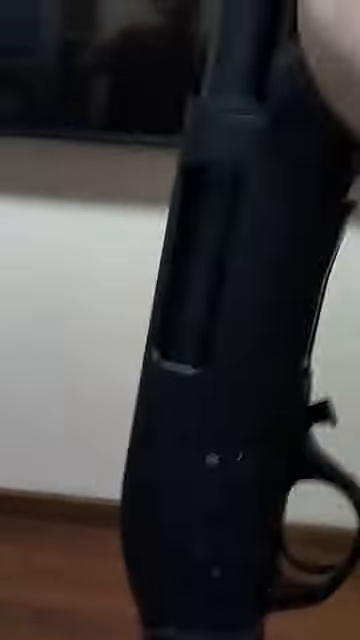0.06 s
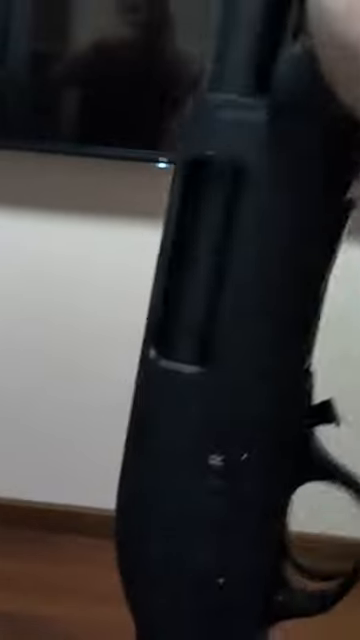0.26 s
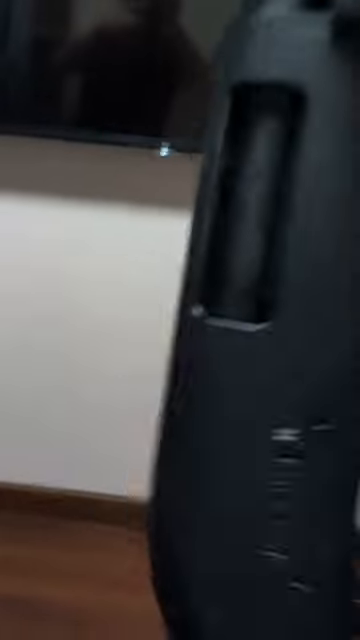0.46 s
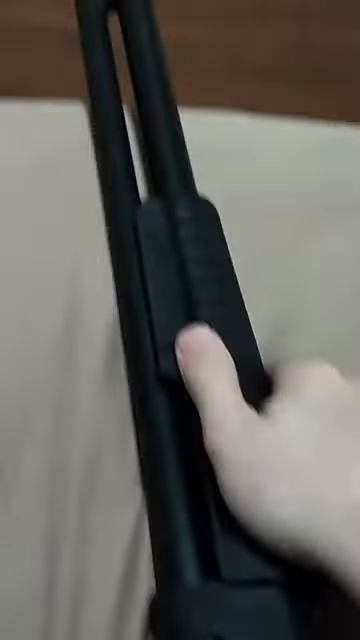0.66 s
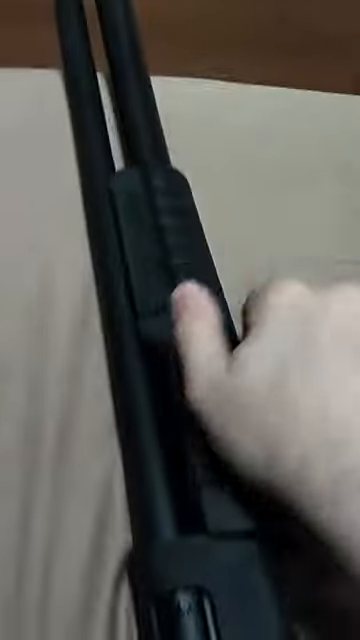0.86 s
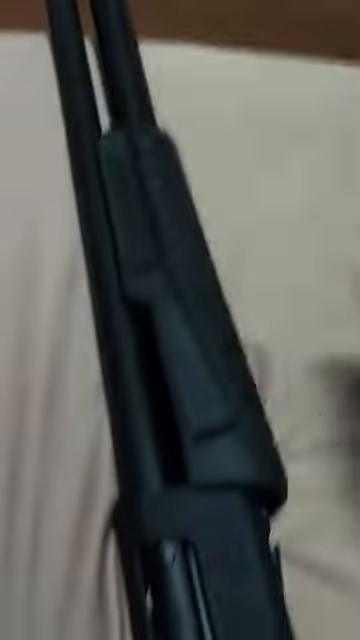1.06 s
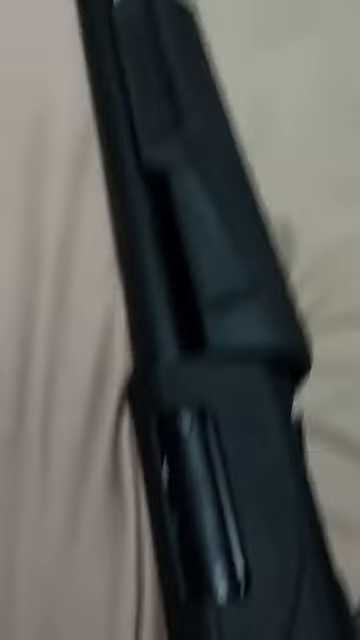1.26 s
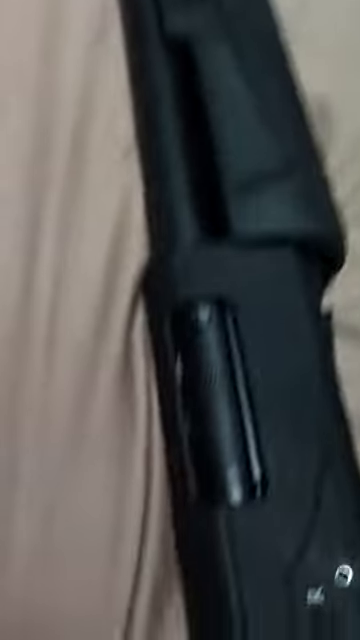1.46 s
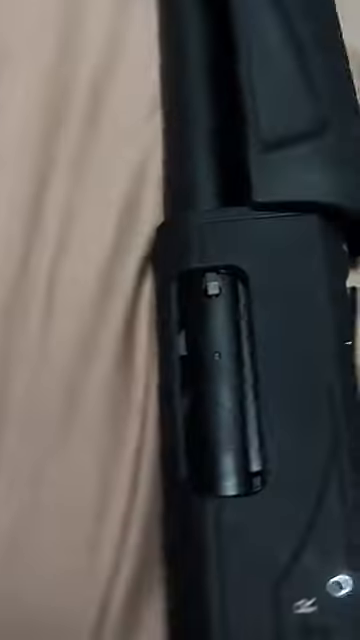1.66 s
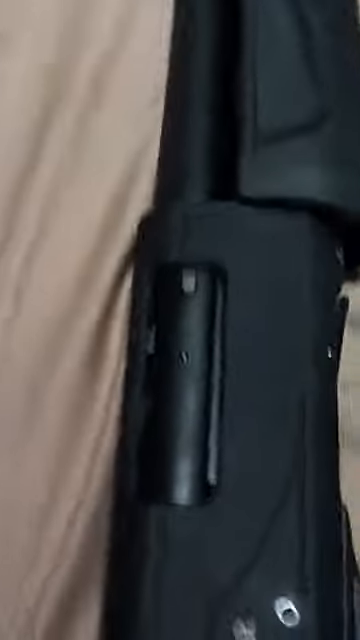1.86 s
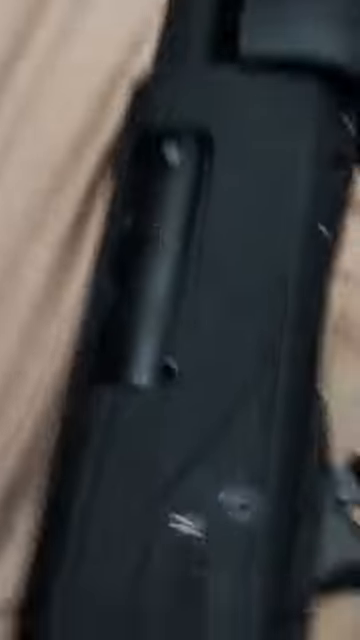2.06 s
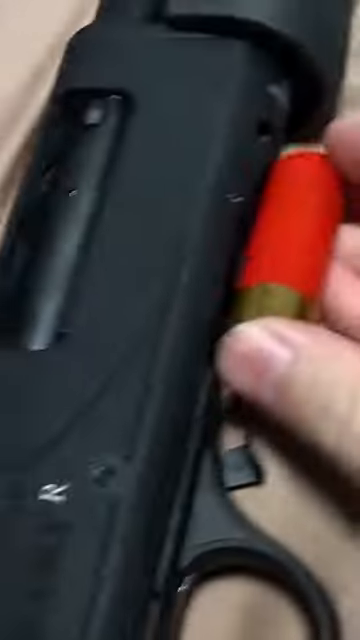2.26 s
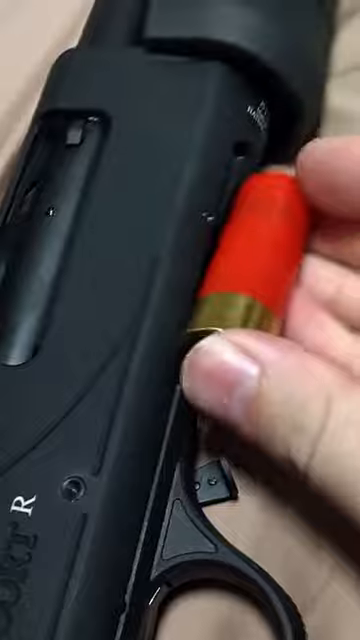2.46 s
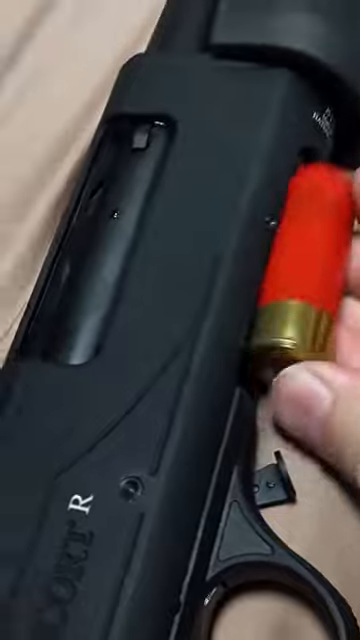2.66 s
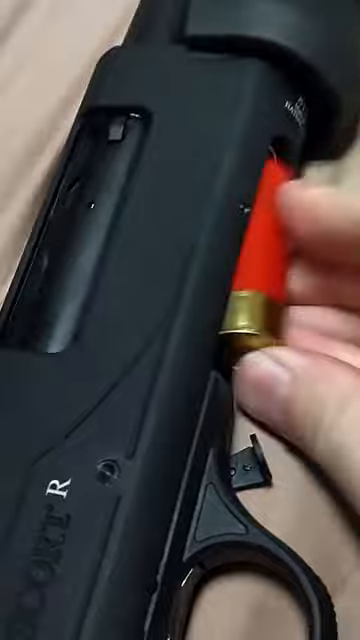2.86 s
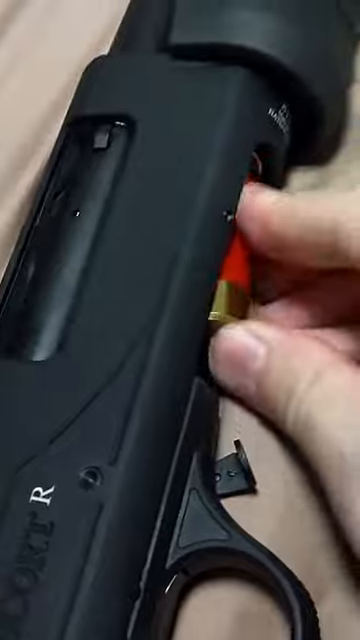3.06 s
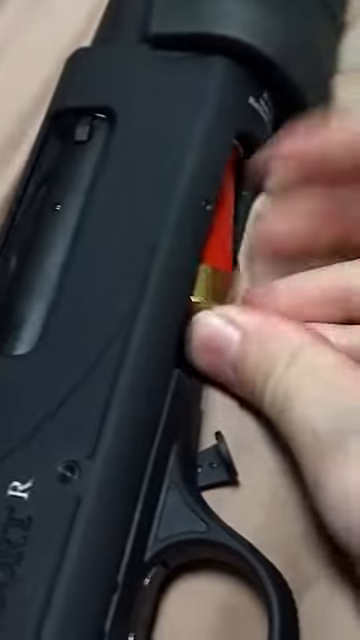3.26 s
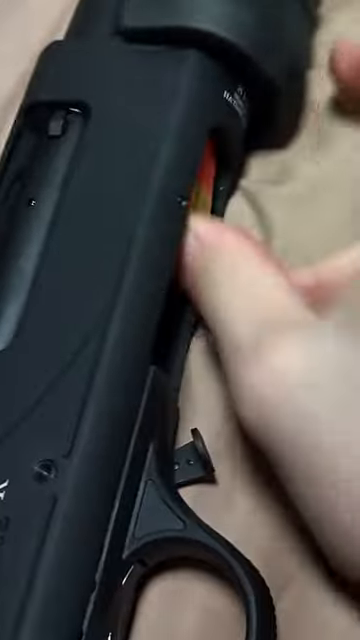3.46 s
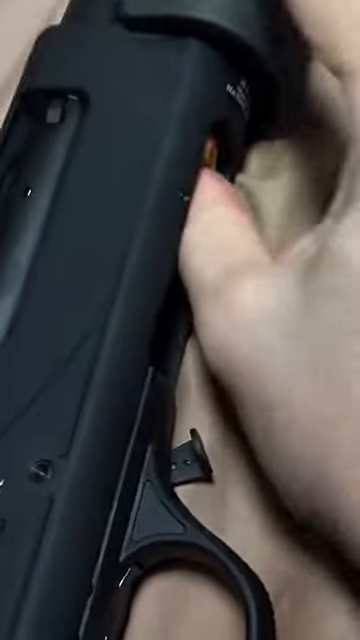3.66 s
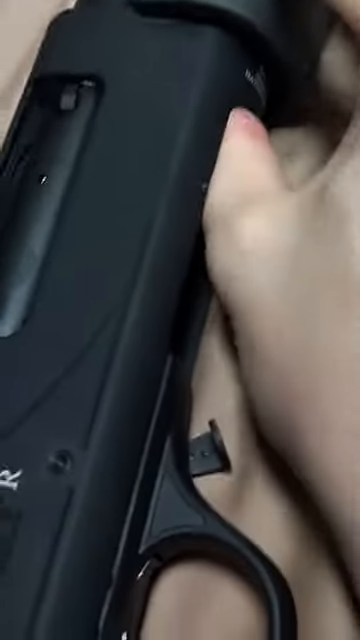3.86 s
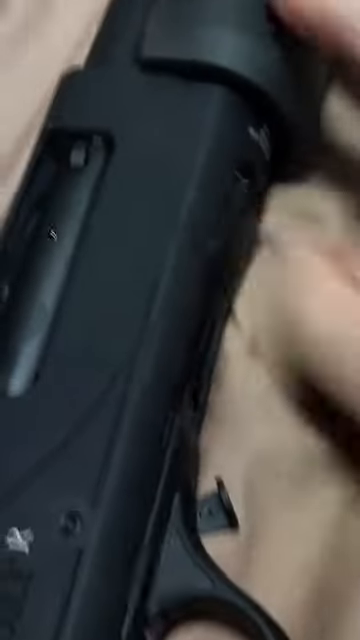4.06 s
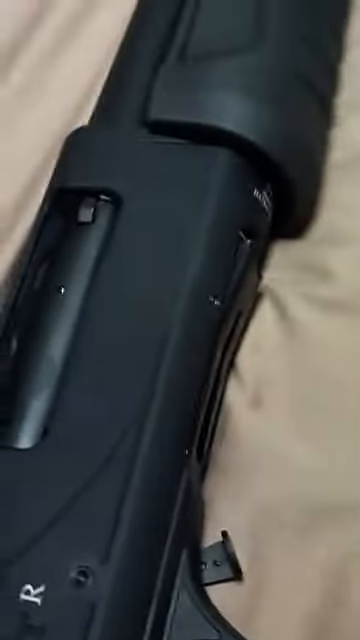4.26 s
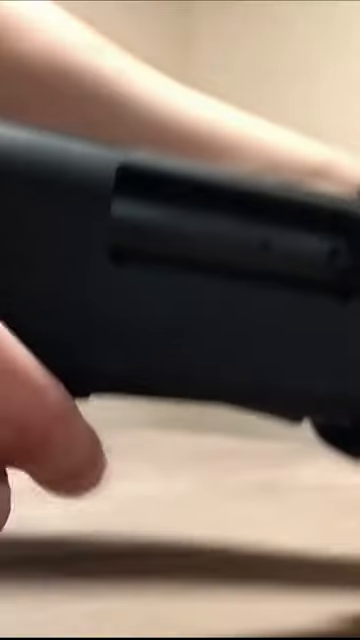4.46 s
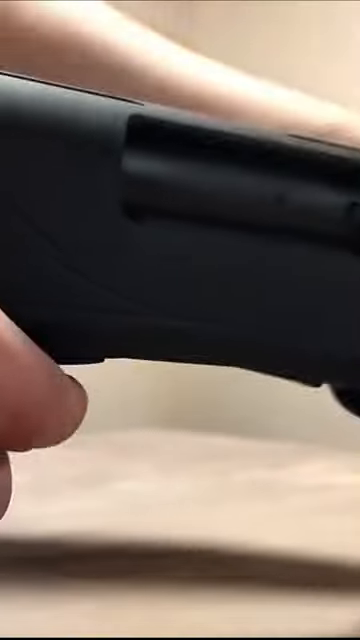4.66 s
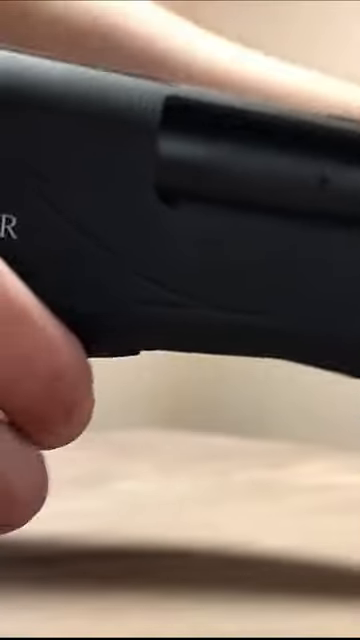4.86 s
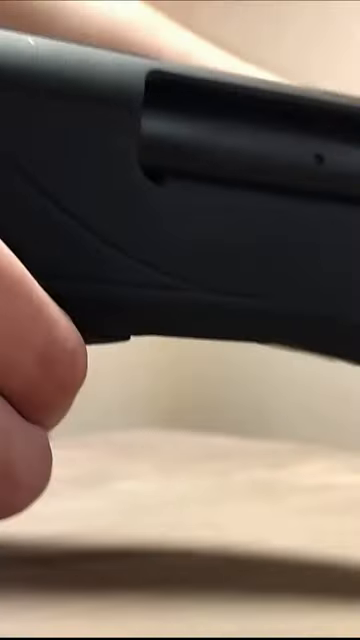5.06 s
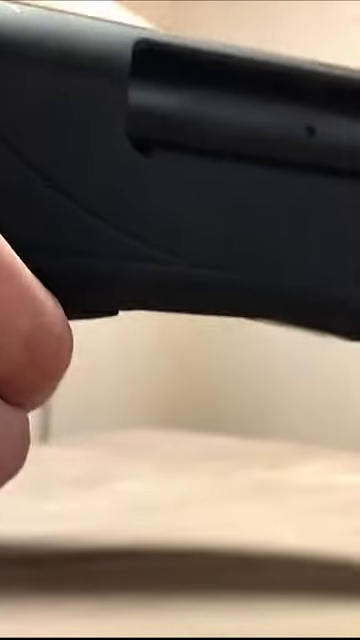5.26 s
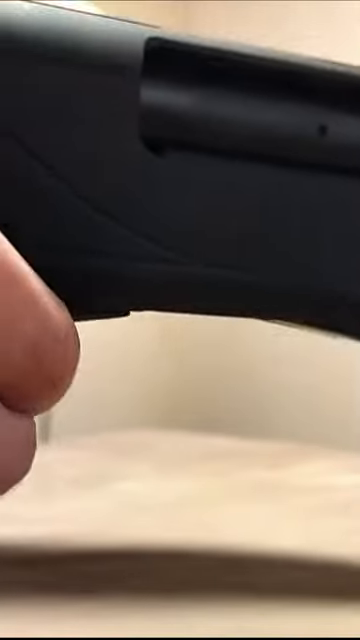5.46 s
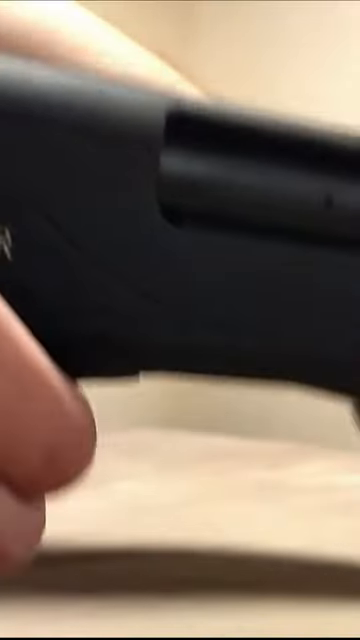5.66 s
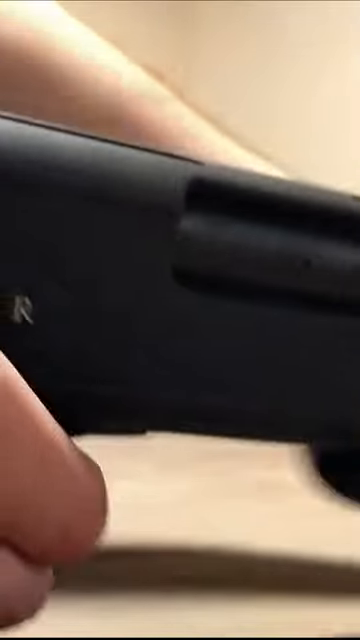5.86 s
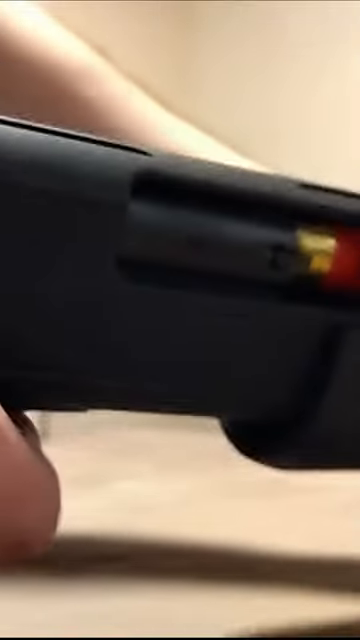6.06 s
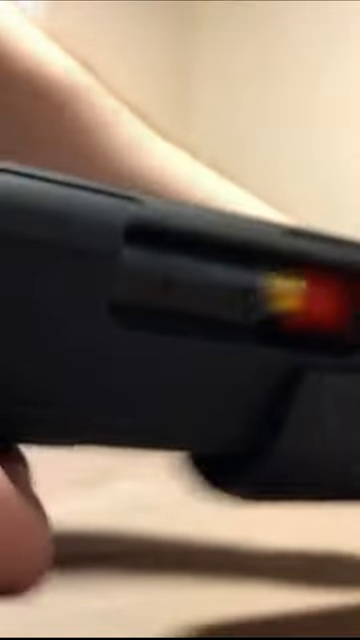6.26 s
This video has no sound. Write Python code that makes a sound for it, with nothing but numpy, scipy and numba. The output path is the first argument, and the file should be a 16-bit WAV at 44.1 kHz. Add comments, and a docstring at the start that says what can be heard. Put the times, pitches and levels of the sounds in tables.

```python
"""The slam of a shotgun slide dies away in a room, over a low rumble; the gun lies on a bed close to a phone.
A shell is then tapped, slid and thumbed into the magazine, and the slide is eased back with a rough whine.
Contacts are short noise chatters that ring hollow and small parts, receiver, steel and room.
Rubbing and faint hiss are stick-slip ticks through broad resonances; the rumble is shaped noise.
Gain control, clipping and band limits shape the sum."""
import sys
import numpy as np
from scipy import signal
from scipy.fft import rfft, irfft
from scipy.io import wavfile
from scipy.ndimage import uniform_filter1d
from numba import njit

SR = 44100
rng = np.random.default_rng(int(sys.argv[2]) if len(sys.argv) > 2 else 0)


def to_wav(s):
    """Save 16-bit WAV."""
    ch = np.atleast_2d(s).T  # columns
    pcm = np.round(np.clip(ch, -1, 1) * 32767)  # PCM
    wavfile.write(sys.argv[1], SR, pcm.astype(np.int16))


N = 277830
LEAD = SR // 10  # samples computed ahead of the start, so that earlier echoes are heard

# Room rumble and hiss, relative: (frequency [Hz], spectral level [dB per Hz])
HUM_SPECTRUM = [(25, -42.5), (45, -30), (74, -16), (113, 2), (148, -7), (200, -7), (235, -12.5),
                (307, -13.5), (333, -14), (437, -18), (1510, -30), (1730, -27.5), (4570, -32.5),
                (12100, -36.5), (15800, -33.5)]
# Left-right correlation of the rumble: (frequency [Hz], correlation [-1..1])
HUM_CORRELATION = [(60, 0.93), (130, 1), (290, 0.94), (640, -0.036), (1410, 0.31), (3100, -0.38),
                   (6820, -0.59), (15000, 0.18)]
HUM_RMS_DB = -46.5  # ahead of the gain control

# Decay of the room: (frequency [Hz], time to fall 60 dB [s])
ROOM_T60 = [(60, 0.56), (200, 0.5), (500, 0.43), (1500, 0.64), (4000, 0.67), (8000, 0.53), (15000, 0.25)]
# Left-right correlation of the echoes: (frequency [Hz], correlation [-1..1])
ROOM_CORRELATION = [(100, .6), (300, 0.21), (1400, -0.12), (5000, 0.14), (8500, 0.63), (11500, 0.74),
                    (15000, 0.505)]
ROOM_GAP_S, ROOM_FILL_S = .007, .011  # way to the first wall and back, time for the echoes to thicken
ECHO_WAVER_DB = 2.4  # random level wavering of the echoes, separate in each band

# Stock, action and bed shaking: (frequency [Hz], width of each of two passes [Hz], level [dB])
THUMP_MODES = [(90, 20, -12), (160, 270, -4.5), (395, 410, -5), (1230, 1200, -2.5), (2727, 2000, -4.5)]
THUMP_RMS_DB, THUMP_T60_S = 13, 0.18  # rms ahead of its band-pass and fade

# One curve per stretch of rubbing or faint hiss:
#   (time [s], cloth and hand level [dB], plastic level [dB], treble level [dB])
RUB_CURVES = [
    [(0.862, -34.5, -47, -70), (0.94, -52, -58, -44), (0.99, -49, -56.5, -59), (1.08, -75, -92, -79)],
    [(1.9, -60.5, -67, -57), (2.2, -50, -58.5, -49), (2.336, -59, -58.5, -55), (2.43, -62, -73, -69),
     (2.6, -53, -58, -72), (2.7, -57, -76, -61), (2.9, -55, -60, -58), (2.99, -42.5, -59, -97),
     (3.1, -47, -54.5, -44), (3.28, -54.5, -93, -54), (3.45, -47.5, -67, -51), (3.55, -39, -54.5, -42),
     (3.62, -42.5, -56, -40.5), (3.71, -42.5, -53, -40.5), (3.74, -63, -68, -53.5), (3.86, -45.5, -63, -46)],
    [(4.41, -63, -76, -77), (4.44, -64, -53.5, -64), (4.55, -41, -53.5, -43.5), (4.65, -52.5, -71, -59),
     (4.72, -92, -89, -80)],
    [(4.87, -64, -72, -60), (4.92, -71, -66, -56), (5.02, -69, -72, -60)],
    [(5.72, -52, -62, -50), (5.784, -40, -39.5, -55), (5.86, -59, -54, -68)],
    [(5.95, -33, -46, -68), (5.99, -62, -48, -78.5), (5.999, -53, -31, -25), (6.022, -21.5, -34.5, -17.5),
     (6.05, -30.5, -38, -48), (6.12, -57, -52, -64)],
]
# Cloth body: (frequency [Hz], width of each of two passes [Hz], level [dB])
CLOTH_MODES = [(844, 1770, 14), (1370, 380, 12.5)]
# Plastic body: (frequency [Hz], width of each of two passes [Hz], level [dB])
PLASTIC_MODES = [(2540, 1100, 11.5), (3330, 1700, 4.5)]
RUB_PAN_DB = 1.5  # left minus right

# Slide running along its bars: (time [s], pitch [Hz], level [dB])
WHINE_CURVE = [(5.955, 3246, -46), (5.991, 3870, -49), (5.996, 3020, -34), (6.015, 3930, -21),
               (6.03, 4460, -28), (6.04, 4700, -60)]

# Barrel, tube and action bars: (frequency [Hz], level [dB])
STEEL_MODES = [(5739, -9), (6800, -8), (6878, -8), (8055, -3), (8465, -3), (8602, 1), (8856, 0), (8945, -1),
               (9370, -2), (9655, -2), (9819, -4), (10008, -5), (10607, -3), (10771, -3), (11300, -5),
               (11750, -1), (11891, -5), (12420, -5), (13640, -4), (14350, -6), (15302, -2)]
STEEL_T60_S = .1
# Broad rings of the receiver: (frequency [Hz], width [Hz], level [dB])
RECEIVER_MODES = [(1700, 310, -3), (2720, 100, -8.5), (3485, 250, -4.5), (4210, 340, -5),
                  (5470, 200, -11.5), (6070, 720, -12.5), (6490, 340, -17.5), (8700, 940, -1),
                  (9700, 130, -7.5), (12070, 260, -12.5), (13400, 400, -14)]
RECEIVER_NEAR_DB, RECEIVER_ECHO_DB, RECEIVER_RUB_DB = 2.755, 3.5, 8.5  # share of contacts, echoes, rubbing
RECEIVER_PITCH_SPREAD, RECEIVER_SPREAD_DB = .025, 3  # from blow to blow; pitch as a fraction

# Slide hitting home, relative: (frequency [Hz], spectral level [dB per Hz])
SLAM_SPECTRUM = [(180, -44), (300, -24), (622, -16), (942, -13), (2700, -12), (3400, -9.5), (4300, -6),
                 (5300, -13.5), (6600, -8), (7500, -9), (9000, -7.5), (10100, -11), (11800, -5),
                 (15800, -11)]
SLAM_S, SLAM_DB, SLAM_RING_DB = -0.035, 12, -35.5  # just before the start

# Contacts in order of time, sharp clicks and slow scuffs mixed: (time [s], strength [dB],
#   left minus right [dB], pitch of the hollow part [Hz], brightness [dB], thud level [dB],
#   time to fall 60 dB [s], room send [dB])
CONTACTS = [(0.001, 5, 0, 2540, 14.5, -15.5, 0.04, -54), (0.801, -41, -6, 1710, -6.5, 5, 0.019, -12),
            (0.861, -17, -4, 1580, -5.5, -21, 0.041, -24), (0.968, -24, -2, 1490, -8, -12, 0.014, -35),
            (2.34, -18.5, -5.5, 985, 0.5, -34, 0.043, -21.5),
            (2.354, -19, 0.5, 2340, 17, -19, 0.019, -38.5), (2.445, -28, 2, 1020, 7.5, -35, 0.013, -55),
            (2.527, -29, -1, 1780, -7, -28, 0.33, -52), (2.558, -30, 1, 1744, 5, -34, 0.028, -52),
            (2.736, -28, 3, 1860, -6, -50, 0.03, -18), (2.743, -26, 0.5, 1740, 2, -39, 0.042, -33),
            (2.779, -28, 4, 1620, 1.5, -12, 0.15, -53), (2.801, -24.5, -4.5, 850, -18, -19.5, 0.073, -50),
            (2.867, -31, 15, 1670, 10.5, -29, 0.0024, -48), (2.95, -26, 0, 915, -6, -17, 0.019, -19.5),
            (2.973, -26.5, 3, 1520, 12, -17, 0.024, -31), (2.989, -18, 3.5, 1630, 6.5, -22, 0.015, -60),
            (3.021, -29, 4, 1560, 1.5, -11, 0.093, -49), (3.028, -33.5, 6, 1700, 6, -6, 0.012, -43),
            (3.097, -22, 0.5, 885, 12.5, -19, 0.01, -37.5), (3.203, -30.5, 8, 1090, -1, -4, 0.028, -14),
            (3.228, -44.5, 6, 1380, 30.5, 7.5, 0.014, -34), (3.365, -31.5, 4, 1500, 1, -10, 0.022, -18.5),
            (3.484, -32, 6, 1690, 4, -8, 0.0083, -15), (3.533, -27.5, -3, 1140, -15, -13, 0.013, -25),
            (3.553, -26.5, -6, 950, -16, -5, 0.011, -42), (3.58, -33, -11, 1150, -12, -17, 0.015, -40),
            (3.633, -59.5, 14, 1410, 36.5, 11, 0.077, -22), (3.657, -42, 5, 1520, 14, 0, 0.015, -39),
            (3.709, -33, 3, 1490, -10, 0.5, 0.0098, -19), (3.764, -37, -1, 1450, 3, -3, 0.051, -34),
            (3.853, -32, 4, 2040, 7, -3, 0.036, -15.5), (3.867, -33, -7, 1570, -21, -9, 0.047, -6.5),
            (3.9, -31, 4, 1990, 8.5, -11, 0.013, -6.5), (3.91, -4.5, 1, 1660, 9, -15.5, 0.014, -26.5),
            (3.938, -16.5, 1, 1710, 4, -13.5, 0.048, -24), (3.967, -30.5, 2, 1240, 24, 4.5, 0.018, -26),
            (4.115, -26.5, 2, 1800, 3, -7, 0.016, -5.5), (4.139, -10.5, -4.5, 1390, 9, -10.5, 0.017, -32),
            (4.177, -13.5, 1, 1000, 5, -10.5, 0.048, -56), (4.377, -38, -7, 1610, -4, -27, 0.016, -25.5),
            (4.432, -30, 0, 2520, -7, -26, 0.037, -32), (4.441, -37, -2, 1900, -10, -35, 0.018, -15),
            (4.452, -31.5, -8, 2010, -8, -22, 0.025, -35), (4.469, -36, -13, 1700, -13, -37, 0.018, -21),
            (4.498, -17, -3, 2500, -0.5, -27, 0.025, -52), (4.509, -15, -4, 1460, -26, -15.5, 0.036, -28.5),
            (4.54, -27.5, 0, 1690, 3, -11, 0.014, -43), (4.595, -30.5, -9, 1730, -6, -15, .035, -49),
            (4.617, -38, -6, 1800, -5, -20, .025, -43), (4.635, -36, -9, 2650, -10, -27, 0.037, -39),
            (4.653, -39, -16, 1890, -12, -20, 0.033, -43), (4.787, -44.5, -19, 1590, -17, -27, 0.022, -36),
            (5.0911, -17.5, -0.5, 1190, 7.5, -25, 0.0094, -35.5),
            (5.254, -34, -5, 1220, -5, 4.5, 0.044, -22.5), (5.6852, -8.5, -6, 1930, -28, -38, 0.0227, -34),
            (5.696, -31, -9, 2150, -11, -34, 0.025, -40), (5.732, -13, -9.5, 1940, -4, -21, 0.067, -25),
            (5.737, -3.5, 3.5, 2160, -10.5, -26, 0.01, -45), (5.751, -14, -5, 1900, 2.5, -17.5, 0.028, -32),
            (5.759, -21, 13, 1930, -8, -23, 0.024, -44), (5.767, -10, -0.5, 2090, 1.5, -40, 0.03, -59),
            (5.78, -27, -8, 2000, -9, -30, 0.034, -50), (5.794, -20, -7, 1960, 0, -30, 0.038, -55),
            (5.805, -20, 0, 1850, 0.5, -15, 0.042, -54), (5.946, -6, -7.5, 2710, -5.5, -44, 0.016, -30.5),
            (5.948, -14.5, 1.5, 1175, 0, -45, 0.015, -43), (5.96, -25, -4, 2700, -12.5, -22, 0.018, -39),
            (5.99, -27, -7, 1970, -14, -22.5, 0.04, -40), (5.9961, -25, -5, 1940, 7.5, -28, 0.03, -19.5),
            (6.025, 1.5, 1, 2050, 0, -42, 0.022, -39.5), (6.032, -12, 0, 1900, 11, -29, 0.025, -68),
            (6.034, -14, -8, 1920, -17, -18, 0.026, -30), (6.045, -15.5, 10, 1550, -10, -8.5, 0.013, -52),
            (6.056, -17, -5, 2920, -26, -23, 0.051, -38), (6.126, -30, -10, 1660, 5, -33, 0.025, -53),
            (6.285, -33.5, 3, 1690, 3, -21, 0.009, -33)]
# Sent to the walls by hollow parts, small parts and snaps: (low edge [Hz], high edge [Hz], level [dB])
RADIATED_BANDS = [(685.3, 3010, -2), (2450, 9110, -1.5), (6420, 14500, -2.5)]
BUILD_UP = 0.042  # time to seat, as a share of the dying time
SEAT_BLOW = 6.2  # one hard blow as the parts seat, against the chatter around it
PORT_LAG_SAMPLES = 9  # the right port hears a contact later
HOLLOW_WIDTH_HZ, THUD_LOW_HZ = 200, 60
SMALL_HZ, BRIGHT_DB_PER_OCTAVE = 3650, 29.5  # small parts; brighter contacts ring smaller ones
SMALL_DB, SNAP_DB = -1.5, 1.5  # above the brightness; snap of a 0 dB contact
SOFT_DB, SOFT_S = -5, 0.03  # snap lost each time the dying time doubles beyond this
HARD = 0.31  # dB of snap gained per dB of strength
ROOM_BRIGHT = 1  # share of the part levels that the echo keeps

LOW_CUT_HZ, TOP_HZ = 45, 15900


def undb(db):
    """Decibels to gain."""
    return 10 ** (np.asarray(db) / 20)


def read(table, hz):
    """Value of a (frequency, value) table on a log-frequency axis."""
    table = np.array(table)
    return np.interp(np.log(hz + 1), np.log(table[:, 0]), table[:, 1])


def level(x, db):
    """Set the rms level."""
    return x * undb(db) / np.sqrt(np.mean(x ** 2))


def band(x, hz, width_hz):
    """Two-pole resonance, gain 1 at the centre."""
    return signal.lfilter(*signal.iirpeak(min(hz, .45 * SR), hz / width_hz, SR), x)


def body(x, modes):
    """Sum of resonances, each passed twice."""
    return sum(undb(db) * band(band(x, hz, width_hz), hz, width_hz) for hz, width_hz, db in modes)


def steep(x, lo_hz, hi_hz):
    """Band-pass with steep sides."""
    return signal.sosfilt(signal.butter(3, [lo_hz, hi_hz], "bandpass", fs=SR, output="sos"), x)


def walk(rate_hz, size=N):
    """Random levels held for 1 / rate and smoothed twice; spread near 1."""
    k = int(SR / rate_hz)
    held = np.repeat(rng.standard_normal(size // k + 1), k)
    return 1.3 * uniform_filter1d(uniform_filter1d(held, k), k)[:size]


def diffuse(size, correlation_table):
    """Spectra of left and right noise of given correlation, and their frequencies."""
    hz = np.fft.rfftfreq(size, 1 / SR)
    correlation = np.clip(read(correlation_table, hz), -.95, .95)
    gains = np.sqrt([(1 + correlation) / 2, (1 - correlation) / 2])
    mid, side = rfft(rng.standard_normal((2, size))) * gains
    return np.array([mid + side, mid - side]), hz


def octaves(hz, step):
    """Centres and overlapping triangular masks, step octaves apart."""
    for centre_hz in 25 * 2 ** np.arange(0, 10, step):
        yield centre_hz, np.clip(1 - abs(np.log2((hz + 1) / centre_hz)) / step, 0, 1)


def pan(db):
    """Left and right gains for a level difference."""
    return undb([[db / 2], [-db / 2]])


def hum():
    """Room rumble and hiss: shaped noise, each octave wavering a little on its own."""
    noise, hz = diffuse(N, HUM_CORRELATION)
    noise = noise * undb(read(HUM_SPECTRUM, hz))
    out = sum(irfft(noise * mask, N) * undb(0.5 * walk(22.0)) for _, mask in octaves(hz, 1.0))
    return level(out, HUM_RMS_DB)


def room(send):
    """Echoes arrive after a gap, thicken, and fade band by band with a wavering level."""
    t = np.arange(SR) / SR
    noise, hz = diffuse(SR, ROOM_CORRELATION)
    echo = np.zeros((2, SR))
    for centre_hz, mask in octaves(hz, .5):
        fade_db = -60 * t / read(ROOM_T60, centre_hz)
        echo += irfft(noise * mask, SR) * undb(fade_db + ECHO_WAVER_DB * walk(130, size=SR))
    echo *= 1 - np.exp(-np.clip(t - ROOM_GAP_S, 0, 1) / ROOM_FILL_S)
    return signal.fftconvolve(send[None], echo, axes=1)[:, :len(send)]


def thump():
    """Shaking of stock, action and bed after the slam: resonant noise that dies before the room does."""
    t = np.arange(N) / SR
    shake = rng.standard_normal(N) + 1.5 * rng.standard_normal((2, N))
    shake = steep(level(body(shake, THUMP_MODES), THUMP_RMS_DB), 70, 9000)
    onset = 1 - np.exp(-t / 0.013)
    return shake * pan(3) * onset * undb(np.maximum(-60 * t / THUMP_T60_S, -200))


def receiver(x):
    """Whatever touches the gun rings its receiver, a little differently each time."""
    chance = rng.standard_normal((len(RECEIVER_MODES), 2)) * [RECEIVER_PITCH_SPREAD, RECEIVER_SPREAD_DB]
    return sum(undb(db + extra_db) * band(x, hz * (1 + shift), width_hz)
               for (hz, width_hz, db), (shift, extra_db) in zip(RECEIVER_MODES, chance))


def rubs():
    """Rubbing and faint hiss: dense stick-slip ticks of uneven size through plastic and cloth."""
    t = np.arange(N) / SR
    tick_gain = undb(np.minimum(3.5 * rng.exponential(size=N), 9))
    sparse = rng.random(N) < .015
    ticks = steep(rng.standard_normal((2, N)) * (.45 + tick_gain * sparse), 350, 16500)
    cloth, plastic = (level(body(ticks, modes), 0) * undb(3.0 * walk(140) + .7 * walk(18))
                      for modes in (CLOTH_MODES, PLASTIC_MODES))
    rings = level(receiver(steep(ticks, 1200, 7000)), RECEIVER_RUB_DB)
    plastic = plastic + rings * undb(5.0 * walk(55))
    treble = level(steep(ticks, 5000, 14400), 0) * undb(2.2 * walk(70))
    out = np.zeros((2, N))
    for curve in RUB_CURVES:
        s, *levels_db = np.transpose(curve)
        fade = np.clip(np.minimum(t - s[0], s[-1] - t) / 0.0044, 0, 1)
        layers = zip(levels_db, (cloth, plastic, treble))
        out += fade * sum(undb(np.interp(t, s, db)) * layer for db, layer in layers)
    return out * pan(RUB_PAN_DB)


def whine():
    """Slide along its bars: a narrow band of noise around a moving pitch."""
    s, hz, db = np.transpose(WHINE_CURVE)
    t = np.arange(N) / SR
    rough = uniform_filter1d(rng.standard_normal((2, N)), size=90) * np.sqrt(90)
    phase = 2 * np.pi * np.cumsum(np.interp(t, s, hz)) / SR
    return rough * np.sin(phase) * undb(np.interp(t, s, db, left=-200, right=-200))


def steel(blows):
    """Blows ring barrel, tube and bars: decaying sines of random phase."""
    t = np.arange(SR // 4) / SR
    phases = 2 * np.pi * rng.random(len(STEEL_MODES))
    ring = sum(undb(db) * np.sin(2 * np.pi * hz * t + phase)
               for (hz, db), phase in zip(STEEL_MODES, phases))
    return signal.fftconvolve(blows, ring * undb(-60 * t / STEEL_T60_S))[:len(blows)]


def slam():
    """The blow of the slide, as one coloured pulse of unit energy."""
    size = SR // 20
    spectrum = undb(read(SLAM_SPECTRUM, np.fft.rfftfreq(size, 1 / SR)))
    pulse = np.roll(irfft(spectrum, size), size // 2)
    out, i = np.zeros(LEAD + N), max(LEAD + int(SLAM_S * SR) - size // 2, 0)
    out[i:i + size] = pulse / np.sqrt(np.sum(pulse ** 2))
    return out


def chatter(t, t60_s):
    """Parts touch in random bursts that grow until they seat with a blow, then die."""
    common, own = rng.standard_normal(len(t)), rng.standard_normal((2, len(t)))
    grit = undb(3.2 * np.repeat(rng.standard_normal(len(t) // 60 + 1), 60)[:len(t)])
    rise_s = BUILD_UP * t60_s
    dying = undb(-60 * (abs(t - rise_s) / t60_s) ** 1.08)
    shape = np.where(t < rise_s, (t / rise_s) ** 0.43, dying)
    out = (common + 2.2 * own) * shape * grit
    out[:, int(rise_s * SR)] += SEAT_BLOW
    out[1] = np.roll(out[1], PORT_LAG_SAMPLES)
    return out


def contacts():
    """Chatter rings the parts it hits; returns direct sound and the broad blows sent to the room."""
    size = SR // 12
    t = np.arange(size) / SR
    near, send = np.zeros((2, LEAD + N + size)), np.zeros(LEAD + N + size)
    impulse = 1. * (t == 0)
    radiated = np.array([undb(db) * steep(impulse, lo_hz, hi_hz) for lo_hz, hi_hz, db in RADIATED_BANDS])
    for s, db, pan_db, hollow_hz, bright_db, thud_db, t60_s, wet_db in CONTACTS:
        t60_s = max(t60_s, .003)
        touch = chatter(t, t60_s)
        small_db, snap_db = SMALL_DB + bright_db, SNAP_DB + bright_db
        snap_db += SOFT_DB * max(np.log2(t60_s / SOFT_S), 0) + HARD * db  # slow contacts are soft
        small_hz = SMALL_HZ * 2 ** (max(bright_db, 0) / BRIGHT_DB_PER_OCTAVE)

        blow = undb(db + wet_db + ROOM_BRIGHT * np.array([0, small_db, snap_db])) @ radiated
        rings = receiver(np.vstack([touch, blow]))  # left, right, room
        hollow = steep(band(touch, hollow_hz, HOLLOW_WIDTH_HZ) + 0.17 * touch, 780, 2900)
        small = steep(band(touch, small_hz, small_hz * 0.22), 2500, 11200)
        small = small + undb(RECEIVER_NEAR_DB) * steep(rings[:2], 3100, 7000)
        thud = steep(touch, THUD_LOW_HZ, 370)
        snap = steep(touch, 6260, 20200)
        parts = [(hollow, 0), (small, small_db), (thud, thud_db), (snap, snap_db)]
        hit = sum(undb(db + part_db) * part / abs(part).max() for part, part_db in parts)

        i = LEAD + int((s - .0005) * SR)
        near[:, i:i + size] += hit * pan(pan_db)
        send[i:i + size] += blow + undb(RECEIVER_ECHO_DB) * rings[2]
    return near[:, :LEAD + N], send[:LEAD + N]


def scene():
    """Contacts, their echo with the ring of the steel in it, slam, whine, rubbing and rumble."""
    near, send = contacts()
    send, blow = undb(11.0) * send, undb(SLAM_DB) * slam()
    ring = steel(undb(-38.5) * send + undb(SLAM_RING_DB) * blow)
    struck = (near + room(send + blow + ring))[:, LEAD:]
    return hum() + thump() + rubs() + whine() + struck


@njit
def follow(size, attack, release):
    """Level follower, quick up and slower down."""
    e, out = size[0] / 2, np.empty(len(size))
    for i in range(len(size)):
        e += (size[i] - e) * (attack if size[i] > e else release)
        out[i] = e
    return out


def record(dry):
    """Gain control holds loud passages down, what gets past it clips, and bottom and top are cut."""
    size = np.sqrt(uniform_filter1d(np.mean(dry ** 2, axis=0), size=64) + 1e-12)
    envelope = follow(size, 1 / (.003 * SR), 1 / (.018 * SR))  # time constants 3 and 18 ms
    held = dry * np.minimum(1, undb(-8.6) / envelope) ** .88
    clipped = np.clip(held, -1, 1)
    thin = signal.lfilter(*signal.butter(2, LOW_CUT_HZ, "high", fs=SR), clipped)
    return signal.sosfilt(signal.ellip(8, .2, 55, TOP_HZ, fs=SR, output="sos"), thin)


dry = scene()
out = record(dry)
to_wav(out)
```